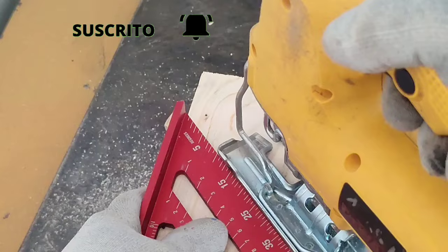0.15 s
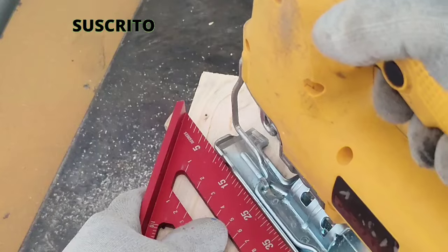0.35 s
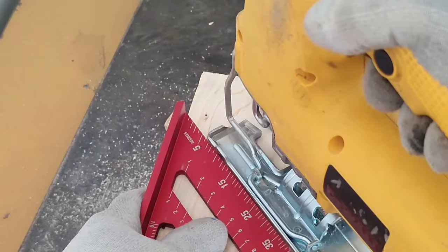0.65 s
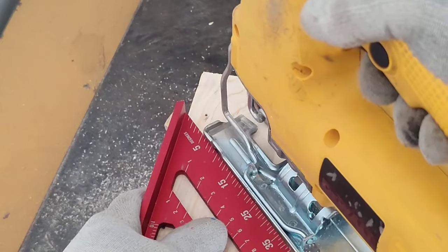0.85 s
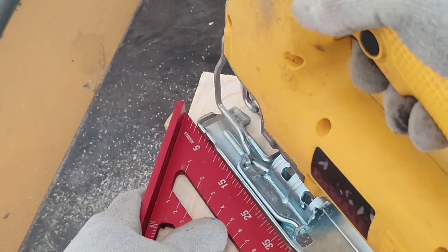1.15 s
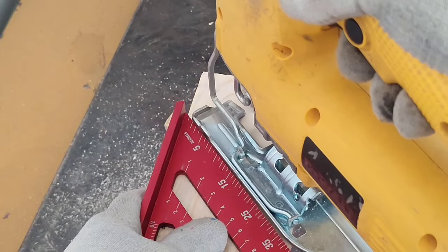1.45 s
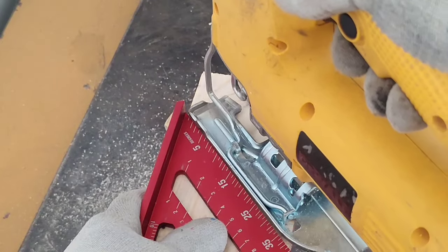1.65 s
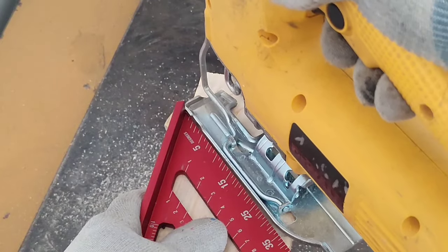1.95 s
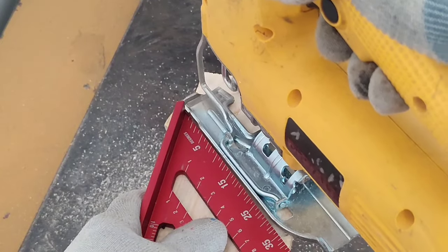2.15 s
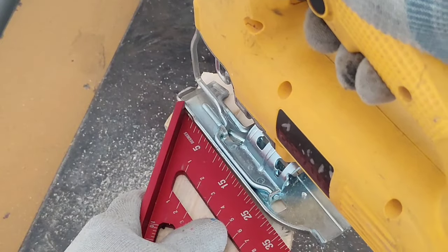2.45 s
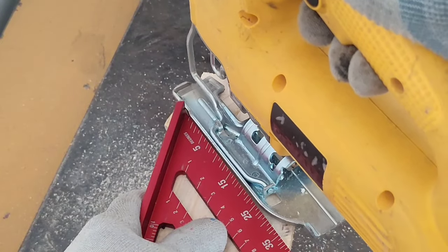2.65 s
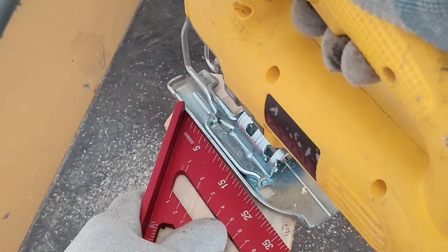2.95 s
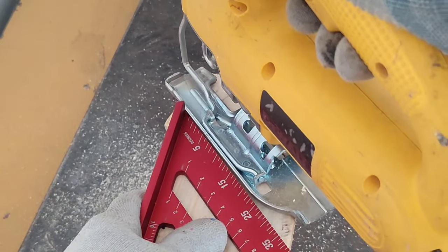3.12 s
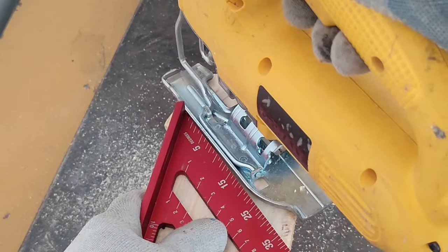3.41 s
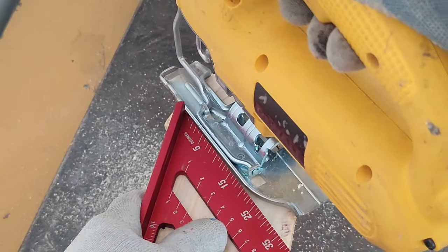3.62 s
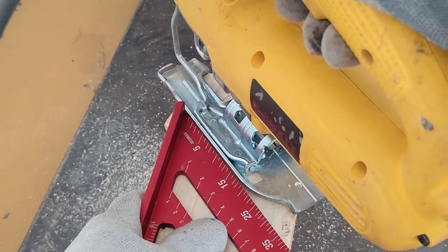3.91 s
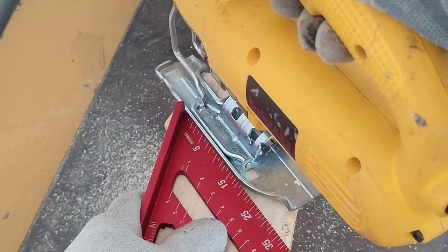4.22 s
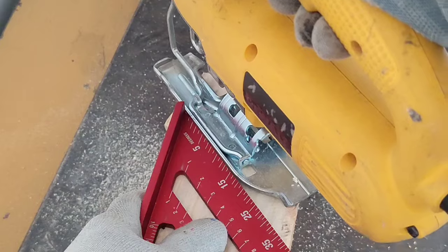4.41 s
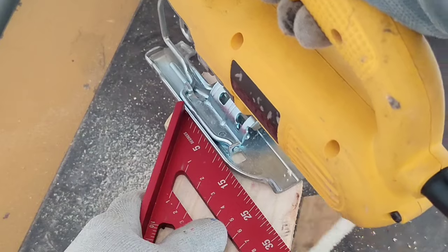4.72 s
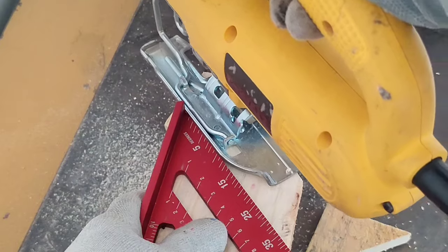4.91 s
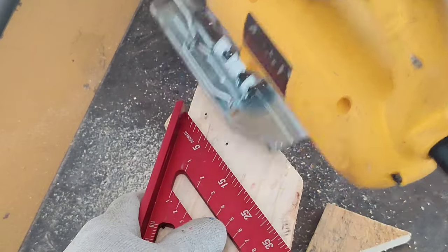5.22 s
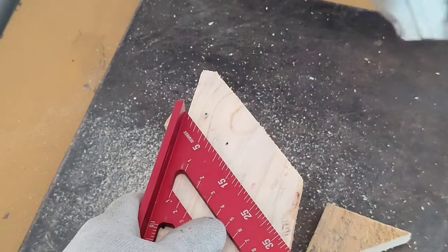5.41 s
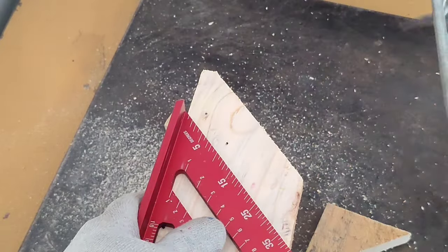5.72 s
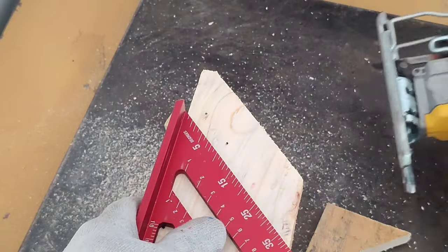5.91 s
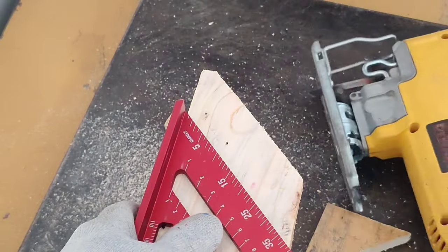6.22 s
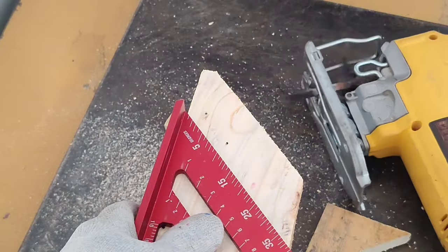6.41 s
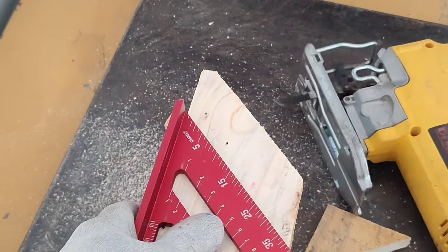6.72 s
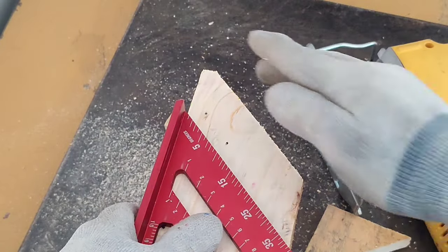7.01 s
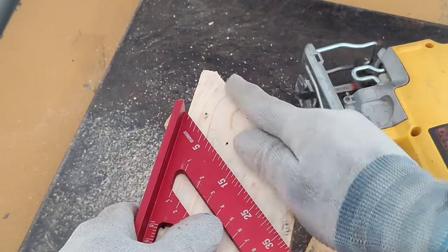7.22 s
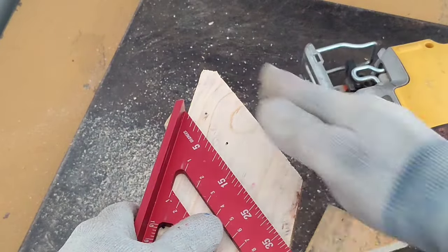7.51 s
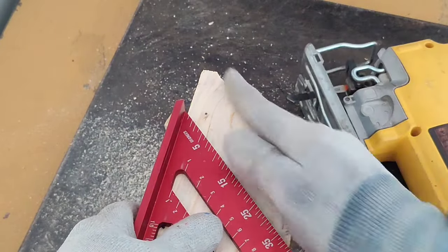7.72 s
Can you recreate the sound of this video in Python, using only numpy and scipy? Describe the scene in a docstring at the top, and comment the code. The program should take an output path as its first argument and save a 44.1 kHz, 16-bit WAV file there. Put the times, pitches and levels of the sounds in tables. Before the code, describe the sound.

From 0 to about 5 seconds a jigsaw runs at full power close to two microphones: a rapid rasping buzz of teeth in wood, bright gear clatter, fan hiss and a thin, very high whine creeping upward. The board's ringing colour shifts as the blade travels; sharp little jolts appear near 2.4, 3.4, 3.9 to 4.3 and 4.6, with brief dips around 4.0 and 4.6. Near 5.0 a low hum swells as the blade leaves the wood. From 5.1 the motor coasts, its whine and rattle sliding down while the tool moves away and the bass thins; the rasp is gone by 5.5. At 6.6 it lands with a dull double thud, small settling knocks and a bench buzz. The uneven rattle slows, swells slightly and stops around 7.45 with a faint knock just before. Quiet room air remains, then a glove brushes the board from 7.75 to the end.

```python
"""A jigsaw rasps and whines through a small board on a bench, close to two microphones. As it leaves the wood
it is switched off; it coasts down while it moves to the right and thuds onto the bench. A glove then brushes
the board. Rasp, rattle, hiss and brushing are shaped noise, tones are sines that follow the motor, and
knocks and jolts are impulses that ring the board, shoe and bench."""
import sys
import numpy as np
from scipy import signal
from scipy.fft import rfft, irfft, next_fast_len
from scipy.io import wavfile
from scipy.ndimage import uniform_filter1d, map_coordinates

SR = 44100
rng = np.random.default_rng(int(sys.argv[2]) if len(sys.argv) > 2 else 0)


def pcm_store(signal):
    """Save signal as 16-bit PCM."""
    levels = np.round(np.clip(np.atleast_2d(signal), -1, 1) * 32767)
    wavfile.write(sys.argv[1], SR, levels.astype(np.int16).T)


N = 346255
TIME = np.arange(N) / SR  # s


def amp(db):
    """Decibels to an amplitude factor."""
    return 10 ** (np.asarray(db) / 20)


def unit(x):
    """Scale to an rms of 1."""
    return x / np.sqrt(np.mean(x ** 2) + 1e-20)


def along(points, hz):
    """Read a curve of (f/Hz, value) points on a log frequency axis."""
    f, v = np.transpose(points)
    return np.interp(np.log(hz + 1), np.log(f + 1), v)


def curves(rows):
    """One value per sample for each column after the time."""
    s, *columns = np.transpose(rows)
    return [np.interp(TIME, s, column) for column in columns]


def bumps(rows):
    """Sum of bell-shaped changes, rows of t/s, half length/s, level/dB."""
    return sum(db * np.exp(-((TIME - s) / half) ** 2) for s, half, db in rows)


def sounding(end_s):
    """1 up to end_s, then a fade to 0 over 0.14 s."""
    return np.clip((end_s - TIME) / 0.14 + 1, 0, 1)


def wobble(rate, size=N):
    """A smooth random curve with rate new values a second."""
    values = rng.standard_normal(int(size * rate / SR) + 4)
    return map_coordinates(values, [TIME[:size] * rate])


def filtered(x, response):
    """Multiply the spectrum by a complex response of frequency."""
    m = next_fast_len(N + SR // 2)
    return irfft(rfft(x, m) * response(np.fft.rfftfreq(m, 1 / SR)), m)[..., :N]


def rung(x, modes):
    """Excite resonances (f/Hz, width/Hz, level/dB) of alternating sign; the sum has rms 1."""
    total = 0
    for k, (hz, width, db) in enumerate(modes):
        ring = signal.lfilter(*signal.iirpeak(hz, hz / width, SR), x)
        total = total + (-1) ** k * amp(db) * ring
    return unit(total)


def coloured(x, spectrum):
    """Tilt the spectrum along (f/Hz, level/dB) points, then scale to rms 1."""
    return unit(filtered(x, lambda hz: amp(along(spectrum, hz))))


def patchy(depth_db):
    """Two noises that share random louder and softer patches of time and frequency."""
    z = signal.stft(rng.standard_normal((2, N)), nperseg=512)[2]
    field = rng.standard_normal(z.shape[1:])
    field = uniform_filter1d(uniform_filter1d(field, 8, 0), 8, 1)
    return signal.istft(z * amp(depth_db * unit(field)), nperseg=512)[1][:, :N]


def blows(turns, scatter_db, jitter):
    """One impulse each time turns passes a whole number, uneven in level and timing (jitter in s)."""
    at = np.flatnonzero(np.diff(np.floor(turns)) > 0)
    chance = rng.standard_normal((len(at), 2))
    at = np.clip(at + np.round(jitter * SR * chance[:, 0]).astype(int), 0, N - 1)
    return np.bincount(at, amp(scatter_db * chance[:, 1]), N)


# How alike left and right are in a wide sound: f/Hz, likeness (1 = identical)
LIKENESS = [(60, 0.84), (150, 0.96), (370, 0.77), (910, 0.18), (2240, 0.22), (5540, 0.2), (13700, 0.83)]


def spread(pair):
    """Mix two unrelated strands into left and right, more alike at some frequencies than others."""
    def mid_side(hz):
        turn = np.arccos(np.clip(along(LIKENESS, hz), -1, 1)) / 2
        return np.array([np.cos(turn), np.sin(turn)])
    mid, side = filtered(pair, mid_side)
    return np.array([mid + side, mid - side])


# Colour of the steady background noise: f/Hz, relative level/dB per Hz
AIR_COLOUR = [(15, -57), (25, -5), (53, -21), (70, -20.5), (148, -1), (374, -3.5), (998, -24), (4410, -22),
              (14200, -28.5)]


def background_air():
    """A quiet steady noise, mostly low, with slight patches."""
    return amp(-57) * spread(coloured(patchy(1.5), AIR_COLOUR))


# How long the room rings: f/Hz, time to fall by 60 dB/s
ROOM_DECAY = [(150, .4), (2000, .3), (12000, .18)]


def room(saw):
    """The room answers the saw with decaying noise; each frequency dies at its own speed."""
    hz, t, z = signal.stft(rng.standard_normal((2, SR // 2)), SR, nperseg=256)
    fade = amp(-60 * t / along(ROOM_DECAY, hz)[:, None])
    tail = signal.istft(z * fade, SR, nperseg=256)[1]
    tail = tail / np.linalg.norm(tail[0])
    delayed = np.pad(saw.mean(0), (500, 0))  # samples
    answer = signal.fftconvolve(delayed[None], tail, axes=1)[:, :N]
    return amp(-13) * spread(answer)


# Glove strokes: t/s, level/dB before a waver and a tilt to the right
BRUSH_LEVEL = [(7.72, -64), (7.76, -52), (7.765, -42), (7.8, -44.5), (7.85, -43)]
# Colour of the glove on the board: f/Hz, relative level/dB per Hz
GLOVE_COLOUR = [(35, -33), (60, -17), (131, -12), (172, -16), (253, -14), (851, -19), (2610, -16),
                (3200, -22), (8960, -24.5), (14200, -32)]


def brush():
    """Knit fingers sweep dust off the board: patchy noise, stronger on the right."""
    side_db = np.array([[-1.4], [1.4]])
    level = amp(curves(BRUSH_LEVEL)[0] + 0.87 * wobble(83) + side_db)
    return level * (TIME > BRUSH_LEVEL[0][0]) * spread(coloured(patchy(4.0), GLOVE_COLOUR))


# Tool laid down and settling: t/s, level of the bench modes/dB, level of the clack/dB, time to fall by 60 dB/s
LANDINGS = [(6.614, -35.5, -19, 0.24), (6.64, -27, -18, 0.13), (6.688, -37.5, -35, 0.27),
            (6.75, -38.5, -40, 0.4), (7.382, -50, -34, 0.3)]
# Modes of the bench top: f/Hz, relative level/dB before a random change, share of the landing's fall time
TOP_MODES = [(48, -9, 2.5), (69.6, -5, 2.5), (123.5, -3, 1.4), (195, -7.5, 0.96), (335, -1, 0.41),
             (537, 4, 0.18), (790, -18, .3), (1093, 5, 0.97)]


def thuds():
    """The tool meets the bench top softly: a dull clack and the top's low modes."""
    out, t = np.zeros(N + SR), TIME[:SR // 2]
    for s, ring_db, clack_db, t60 in LANDINGS:
        ring = 0
        for hz, level, share in TOP_MODES:
            fading = amp(level + rng.normal(0, 2.5) - 60 * t / (t60 * share))
            ring = ring + fading * np.sin(2 * np.pi * hz * t + 1.3 * wobble(30, size=len(t)))
        dull = signal.lfilter(*signal.butter(1, 900 / SR * 2), rng.standard_normal(len(t)))
        clack = amp(-60 * t / t60) * dull
        soft_start = 1 - np.exp(-t / 0.0019)
        out[round(s * SR):][:len(t)] += (amp(ring_db) * ring + amp(clack_db) * clack) * soft_start
    return out[:N]


# Motor under power, gaining speed as it warms and sagging under load:
# t/s, fan blade tone f/Hz, blade tone level/dB before later trims
POWERED = [(0, 8400, -28), (.49, 8567, -25), (1.47, 8751, -20), (2.3, 8915, -22), (2.9, 8785, -27),
           (3.43, 8922, -29), (4.06, 9080, -29), (4.41, 9060, -30), (4.74, 9152, -30), (4.9, 9327, -26),
           (5.1, 9430, -25)]


def speed():
    """Blade tone in Hz: the powered curve, then friction and drag slow the rotor."""
    friction_hz_per_s, drag_per_s = 1950, .41  # a steady loss and one that grows with speed
    rest = friction_hz_per_s / drag_per_s
    coast = np.exp(-drag_per_s * np.maximum(TIME - POWERED[-1][0], 0))
    braking = 220 * np.maximum(TIME - 6.3, 0)  # Hz; brushes and bearings brake harder at low speed
    return np.maximum((curves(POWERED)[0] + rest) * coast - rest - braking, 300)


STROKE, MESH, SHAFT = 1 / 163.6, 1 / 2.135, 1 / 17.1  # rates as shares of the blade tone

# Bench shaken by the stroke: t/s, second order level/dB, first order level/dB before a 4.5 dB cut
BENCH_SHAKE = [(0, -42, -35), (.3, -35, -46), (1.2, -35.5, -40.5), (3, -40, -36.5), (3.5, -46, -41),
               (3.8, -55, -44), (4.6, -41, -46), (4.85, -35, -45), (4.96, -24.5, -38), (5.22, -28, -43),
               (5.34, -50, -60), (5.42, -41, -64)]
# The bench's own low mode: f/Hz, width/Hz, level/dB
BENCH_BOOM = [(117, 16, 0)]


def hum():
    """The bench follows the first two orders of the stroke, unevenly, and rings on at its last pitch."""
    second_db, first_db = curves(BENCH_SHAKE)
    phase = 2 * np.pi * STROKE * np.cumsum(curves(POWERED)[0]) / SR
    boom = rung(rng.standard_normal(N), BENCH_BOOM)
    second = np.sin(2 * phase + 0.3 * wobble(22)) + 0.2 * boom
    second = amp(second_db + 1.2 * wobble(28)) * second
    first = amp(first_db - 4.5 + 2.1 * wobble(20)) * np.sin(phase + .8 * wobble(12))
    return (second + first) * sounding(BENCH_SHAKE[-1][0])


STOP_S, STOP_DB_PER_S = 7.455, 142  # the gears come to rest
# Motor levels before coasting: t/s, gear rattle level/dB before a 1 dB lift, fan hiss over the rattle's value/dB
MOTOR_LEVEL = [(0, -20, 0.5), (.6, -20.5, -1.5), (1.5, -19.5, -1.5), (2, -19, -1), (2.75, -22.5, 2),
               (3.4, -20.5, 1.5), (4.2, -22.5, 1), (4.5, -20.5, 2), (4.75, -19, 1), (5.08, -20.5, 2)]
# The level dips briefly: t/s, half length/s, depth/dB (the rasp takes it in full)
LEVEL_DIPS = [(3.99, 0.02, 7), (4.6, 0.07, 3.5)]
# The rattle swells once more before it stops: t/s, half length/s, rise/dB
LAST_SWELL = [(7.41, 0.025, 2.5)]


def motor_levels(hz):
    """Rattle and hiss in dB: as the rotor coasts, each falls as a power of its speed over the stall."""
    stall_hz, rattle_power, hiss_power = 150, 0.6, 1.24
    gear_db, hiss_db = curves(MOTOR_LEVEL)
    slowed_db = 20 * np.log10(np.maximum(hz - stall_hz, 30) / (curves(POWERED)[0] - stall_hz))
    gear_db = gear_db - 0.7 * bumps(LEVEL_DIPS) - STOP_DB_PER_S * np.maximum(TIME - STOP_S, 0)
    hiss_db = gear_db + hiss_db + hiss_power * slowed_db
    return gear_db + rattle_power * slowed_db + bumps(LAST_SWELL), hiss_db


# Colour of the fan hiss: f/Hz, relative level/dB per Hz
FAN_COLOUR = [(2060, -11.5), (3500, 4.5), (4320, 5), (5360, 1.5), (7440, 6.5), (8220, 2.5), (8760, -6.5),
              (9850, -2), (12300, -0.5), (14200, -9)]
# Top of the hiss over the rest of it, before a random change: t/s, level/dB
HISS_TOP = [(5.1, 0), (5.7, 3), (6.3, 2.5), (6.8, 3.3), (7.3, -0.5)]


def fan_hiss(hiss_db):
    """Fan hiss: coloured noise; its level above 8.8 kHz varies at random."""
    rush = coloured(patchy(1.7) * amp(1.6 * wobble(50)), FAN_COLOUR)
    treble = filtered(rush, lambda f: f > 8800)
    treble_gain = amp(curves(HISS_TOP)[0] + 1.56 * wobble(25))
    return amp(hiss_db) * (rush - treble + treble_gain * treble)


# Colour of the gear rattle: f/Hz, relative level/dB per Hz
GEAR_COLOUR = [(88, -64), (150, -22), (167, -31), (195, -32), (373, -15), (435, -16), (1070, -2.5),
               (1520, 0.5), (2530, 1.5), (4020, -7.5), (6000, -12.5), (7800, -68), (13200, -120)]
# Rings of the tool's casing: f/Hz, width/Hz, relative level/dB
CASING_RINGS = [(2150, 170, 4.5), (2405, 260, 1), (3270, 110, -3.5), (7460, 400, -9)]
# Bench top buzzing under the coasting tool: f/Hz, width/Hz, relative level/dB
BENCH_BUZZ = [(1070, 70, 0), (120, 40, -7), (55, 30, -14)]
# Spells of stronger buzz: t/s, half length/s, rise/dB
BUZZ_SWELLS = [(6.76, .16, 7), (7.04, .04, 6), (7.18, .05, 8)]


def gear_rattle(gear_db, load):
    """Gears clatter in time with the stroke and ring the casing; the bench buzzes once the tool lies on it."""
    gears = patchy(1.3) * amp(.5 * load + 0.9 * wobble(40) + .6 * wobble(8))
    # as fan and load fade the casing's ring stands out
    free = np.interp(TIME, [5.8, 6.3], [.25, .75])
    # the clatter wavers in level, less once the gears run unloaded
    gears = gears * amp(2 * (free - 0.57) * wobble(90))
    body = coloured(gears, GEAR_COLOUR) + free * rung(gears[::-1], CASING_RINGS)
    rattle = amp(gear_db + 1.0) * body / np.hypot(1, free)
    buzz = amp(gear_db - 20.5 + bumps(BUZZ_SWELLS)) * rung(gears, BENCH_BUZZ)
    return rattle + buzz * (TIME > LANDINGS[0][0])


def tone(share, turns, db, drift):
    """A sine at a share of the blade tone, wavering in level and phase."""
    level = amp(db + 3 + 2.5 * wobble(30))
    return level * np.sin(2 * np.pi * share * turns + drift * wobble(60))


# How strongly the tool radiates each tone at the pitch it has: f/Hz, level/dB before tone() lifts it by 3 dB.
# Gear mesh, its second and third multiples, and the shaft:
MESH_RADIATION = [(350, -75), (600, -55), (1000, -53), (1400, -47), (1800, -37), (2200, -39), (2400, -34),
                  (2640, -26), (2850, -38), (3170, -26), (3400, -33), (3620, -26), (3860, -38), (4030, -39),
                  (4150, -38), (4250, -35), (4300, -42), (4430, -45)]
DOUBLE_RADIATION = [(500, -64), (750, -55), (1100, -51), (1500, -54), (2000, -40), (2400, -40), (2800, -52),
                    (6000, -50), (7500, -37), (8000, -40), (8400, -60)]
TRIPLE_RADIATION = [(2000, -60), (2900, -45), (3600, -52), (9000, -55), (10300, -38), (11500, -38),
                    (12000, -44), (13000, -46)]
SHAFT_RADIATION = [(100, -80), (250, -60), (320, -50), (390, -45), (430, -54), (500, -62)]
# Blade tone against its powered level: f/Hz, level/dB
BLADE_RADIATION = [(1200, -40), (5800, -22), (6800, -11), (7600, -2), (8300, -3), (8500, 0)]
# The mesh tone stands out early in the cut: t/s, half length/s, rise/dB
EARLY_WHINE = [(.1, .22, 11), (.38, .05, 5)]


def motor_tones(hz, turns, load):
    """Fan blades, gear mesh and shaft each sing at their own share of the motor's speed."""
    # the blade tone now and then drops out, at other moments left and right
    flicker = np.tanh(1.3 * np.array([wobble(32), wobble(32)]) + 1.15)
    blade_level = amp(curves(POWERED)[1] + 2 + along(BLADE_RADIATION, hz))
    blade = blade_level * flicker * np.sin(2 * np.pi * turns + .9 * wobble(70))
    mesh_db = along(MESH_RADIATION, MESH * hz) + bumps(EARLY_WHINE) + 6 * load
    mesh = tone(MESH, turns, mesh_db, 2.6)
    double = tone(2 * MESH, turns, along(DOUBLE_RADIATION, 2 * MESH * hz), 1.8)
    triple = tone(3 * MESH, turns, along(TRIPLE_RADIATION, 3 * MESH * hz), 1.5)
    shaft = tone(SHAFT, turns, along(SHAFT_RADIATION, SHAFT * hz), .7)
    return (blade + mesh + double + shaft + triple) * sounding(STOP_S)


def motor(hz, turns):
    """Rattle, hiss and tones share one rotor; the load swings once a stroke."""
    gear_db, hiss_db = motor_levels(hz)
    load = np.cos(2 * np.pi * STROKE * turns)
    noise = gear_rattle(gear_db, load) + fan_hiss(hiss_db)
    return spread(noise) + motor_tones(hz, turns, load)


# The stroke as the cut goes on: t/s, return stroke over cutting stroke (0-1), depth of the bursts
STROKE_BITE = [(0, 1, 0.86), (2.4, 0.9, 1.68), (3.2, 0.32, 1.08), (3.8, 0.27, 1.68), (4.5, 0.7, 2.15),
               (4.7, 0.9, 0.83), (5.3, 1, 0.65)]
# Sudden jolts of the shoe, teeth catching and at 4.57 s the offcut snapping off: t/s, peak level/dB before
# JOLT_DB is added
SUDDEN_JOLTS = [(2.4094, -11), (3.402, -9), (3.8914, -5), (3.9594, -4), (4.195, -7), (4.2956, -4),
                (4.5742, -1)]
JOLT_DB = 42.5  # strength of a full-scale jolt over the rms of the reversals


def cutting_forces(strokes):
    """Teeth rasp in bursts at both ends of each stroke; reversals, catching teeth and the snapping offcut give
    jolts."""
    back, depth = curves(STROKE_BITE)
    up = blows(strokes, 1.9, jitter=0.00012)
    down = blows(strokes + .45, 3.0, jitter=0.00034)
    fade = np.exp(-np.arange(SR // 40) / SR / 0.003)
    bite = depth * signal.fftconvolve(up + back * down, fade)[:N]
    bursts = (1.2 + bite) / (1.4 + 0.14 * depth)
    teeth = unit(spread(patchy(1.65) * bursts * amp(1.8 * wobble(18))))
    s, peak_db = np.transpose(SUDDEN_JOLTS)
    jolts = np.bincount(np.round(s * SR).astype(int), amp(peak_db + JOLT_DB), N)
    reversals = depth * unit(up - back * down) + jolts
    shove = unit(up - .3 * down) + .12 * teeth
    return teeth, reversals, shove


# Blade in the wood: t/s, rasp level/dB, low knock level/dB, high knock level/dB (all before LEVEL_DIPS)
CUT_LEVEL = [(0, -19, -35.5, -36.5), (.3, -19.5, -33.5, -33.5), (.7, -20.5, -43, -39),
             (1.7, -23, -41.5, -35), (2.4, -23.5, -44.5, -35.5), (3, -19, -38.5, -30),
             (3.6, -20.5, -48.5, -32), (4.45, -24, -48, -33.5), (4.7, -22.5, -51, -34),
             (5.2, -22, -53.5, -35), (5.25, -24, -66, -54), (5.5, -27.5, -67, -61)]
# Narrow rings of the board, then of shoe and blade: f/Hz, width/Hz
PART_RINGS = [(800, 60), (1000, 80), (1255, 60), (1430, 100), (1530, 130), (2080, 120), (2520, 120),
              (2820, 120), (4350, 200), (895, 370)]
# Usual level of each ring in PART_RINGS over the rasp: level/dB
PART_LEVEL = [-17, -22.5, -16.5, -12.5, -5.5, -21, -27, -19.5, -15, -9]
# As the blade travels a ring stands out for a spell; one list for each ring: t/s, half length/s, rise/dB
PART_SPELLS = [
    [(1.4, 0.47, 4), (2.7, 0.16, 11)],
    [(1.85, 0.075, 10.5), (3.6, 0.083, 13)],
    [(.3, 0.33, 7.5), (2.3, 0.49, 11.5), (3.2, 0.3, 9.5), (4.8, .25, 9)],
    [(2.6, 0.89, 12), (4.45, .2, 7)],
    [(.7, 0.42, 3.5), (2.3, 0.21, 1), (3, .35, -5.5), (3.65, 0.23, 3), (4.3, 0.27, -3.5), (5, .3, -10.5)],
    [(.6, 0.47, 14), (1.5, 0.54, 15.5), (4.4, 0.22, 13.5)],
    [(0.352, .4, 16.5)],
    [(2.1, 0.8, 12.5), (3.4, 0.52, 12), (4.45, 0.27, 15.5)],
    [(.2, 1, 7), (4.75, 0.16, 16)],
    [(.3, 0.56, -1.5), (2.8, 0.52, 0), (4.2, 0.77, -5)],
]
# Broad rings of the board, low and high modes of the bench: f/Hz, width/Hz, relative level/dB
BOARD_RINGS = [(1480, 1900, 6.5), (2300, 410, 2.5)]
LOW_MODES = [(211, 87, -4), (307, 48, 0)]
HIGH_MODES = [(447.4, 88, 0.5), (529, 172, 3.5), (554, 42.7, 7.5), (784, 61, -8.5)]


def cut(strokes):
    """The rasp of the teeth rings board, shoe and blade; each reversal knocks the bench as well."""
    dip_share = np.array([[1], [3.2], [3.2]])  # knocks dip more than the rasp
    rasp_db, low_db, high_db = curves(CUT_LEVEL) - dip_share * bumps(LEVEL_DIPS)
    teeth, reversals, shove = cutting_forces(strokes)
    force = teeth + 0.2 * reversals
    slaps = teeth + 1.6 * reversals  # narrow rings answer mostly to the reversals
    rings = 0
    for k, (db, spells, (hz, width)) in enumerate(zip(PART_LEVEL, PART_SPELLS, PART_RINGS)):
        level = amp(db + bumps(spells) + 2.0 * wobble(30))
        rings = rings + (-1) ** k * level * rung(slaps, [(hz, width, 0)])
    low = amp(low_db) * rung(rung(shove, LOW_MODES), LOW_MODES)
    high = amp(high_db) * rung(shove, HIGH_MODES)
    rasp = amp(rasp_db) * (0.85 * rung(force, BOARD_RINGS) + rings)
    return (rasp + low + high) * sounding(CUT_LEVEL[-1][0])


# Path of the tool: t/s, left over right level/dB, way from board to resting place (0-1)
TOOL_PATH = [(0, 0, 0), (5.2, -.5, 0), (5.6, -3, 1), (7.85, -3, 1)]
# Phase by which left leads at the board and at the resting place: f/Hz, lead/radians
BOARD_LEAD = [(100, 0), (1000, .2), (2500, .7), (4000, .7), (5500, 2.9), (7000, 2 * np.pi),
              (9500, 2 * np.pi), (11500, 7.3)]
REST_LEAD = [(700, -.2), (1550, -2), (2900, -1.6), (4200, -3.4), (5400, -4.4), (6400, -2 * np.pi)]


def placed(x):
    """Level and arrival at the two microphones follow the tool from the board to its resting place."""
    pan_db, way = curves(TOOL_PATH)

    def leads(hz):
        return np.exp(1j * np.array([along(BOARD_LEAD, hz), along(REST_LEAD, hz)]))
    board, rest = filtered(x[0], leads)
    left = np.sqrt(1 - way) * board + np.sqrt(way) * rest
    return np.array([amp(pan_db / 2) * left, amp(-pan_db / 2) * x[1]])


# Level of the bass, before its drop is varied at random: t/s, level/dB
BASS_LEVEL = [(5.58, 0), (5.72, -11), (6.12, -11), (6.3, -4), (6.58, -2), (6.6, 0)]


def thin_bass(x):
    """The bass is thinner and comes and goes in short gaps from 5.6 to 6.6 s."""
    bass = filtered(x, lambda hz: 1 / (1 + (hz / 230) ** 6))
    gaps = 1 + 1.1 * np.tanh(2 * wobble(21))  # multiplies the drop in dB
    return x + (amp(curves(BASS_LEVEL)[0] * gaps) - 1) * bass


def scene():
    """One motor speed drives cut and motor; room, air and glove join the saw."""
    hz = speed()
    turns = np.cumsum(hz) / SR
    saw = cut(STROKE * turns) + hum() + motor(hz, turns) + thuds()
    return thin_bass(placed(saw) + room(saw) + background_air()) + brush()


# Colour difference of the two microphones: f/Hz, left over right level/dB
MIC_BALANCE = [(60, 2.5), (150, 3), (370, -1), (910, 2.5), (2240, -0.5), (5540, -1), (13700, 1.5)]


def record(dry):
    """The two microphones differ in colour; peaks round off; nothing passes above the band limit."""
    sides = np.array([[1], [-1]])
    ports = filtered(dry, lambda hz: amp(along(MIC_BALANCE, hz) / 2 * sides))
    soft = ports / (1 + np.abs(ports / .98) ** 5) ** (1 / 5)
    return filtered(soft, lambda hz: hz < 14300)


dry = scene()
out = record(dry)
pcm_store(out)
```